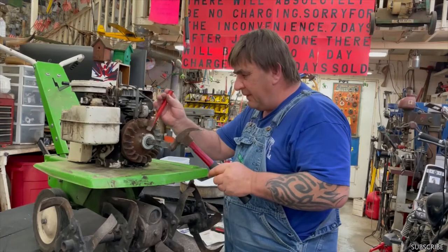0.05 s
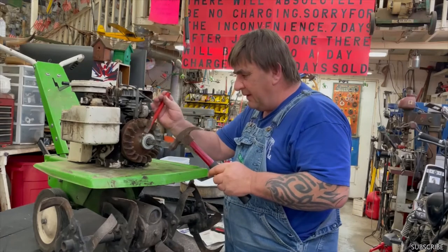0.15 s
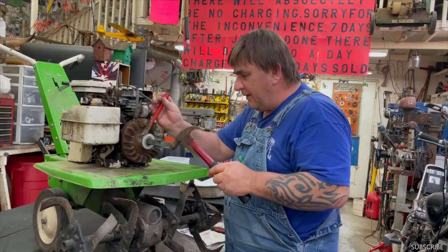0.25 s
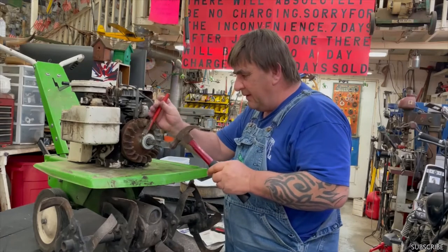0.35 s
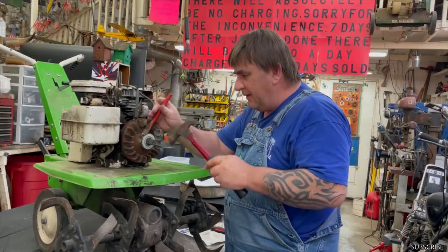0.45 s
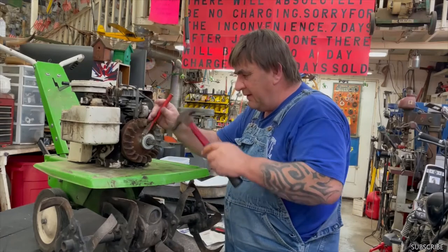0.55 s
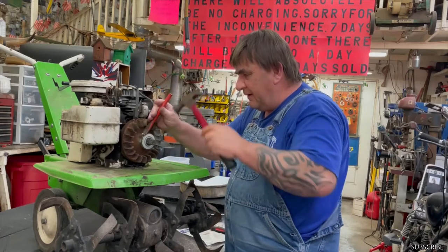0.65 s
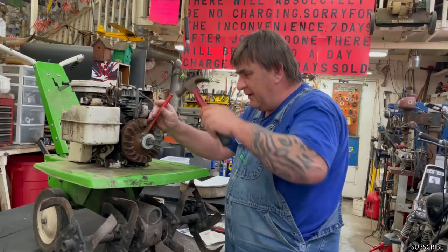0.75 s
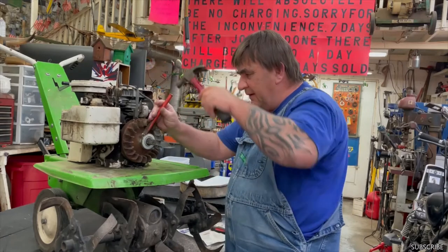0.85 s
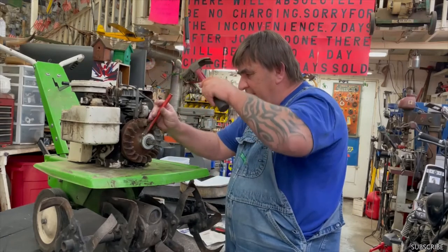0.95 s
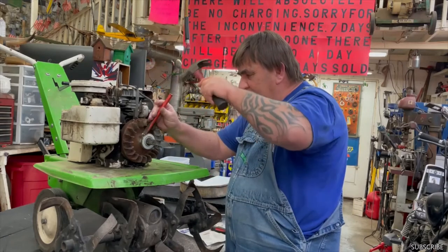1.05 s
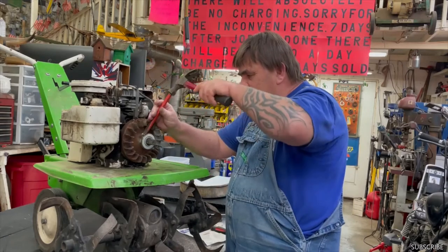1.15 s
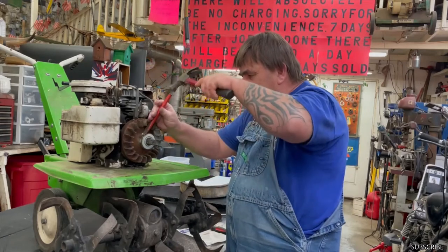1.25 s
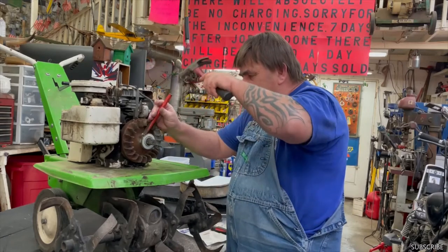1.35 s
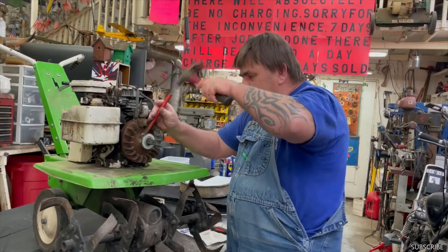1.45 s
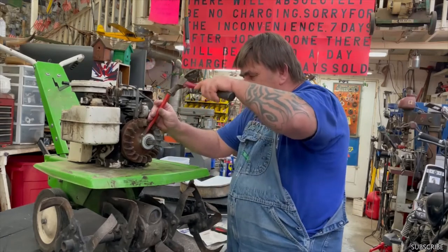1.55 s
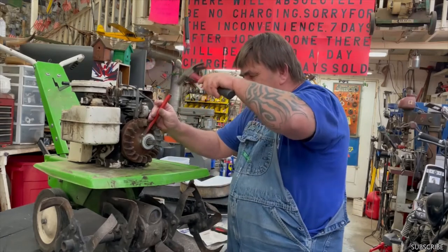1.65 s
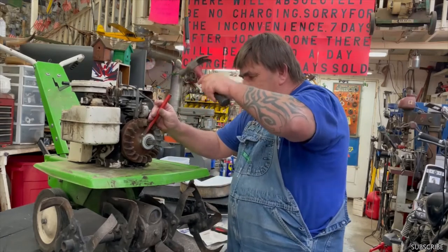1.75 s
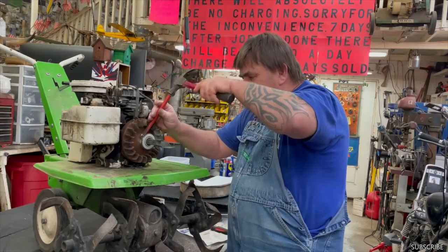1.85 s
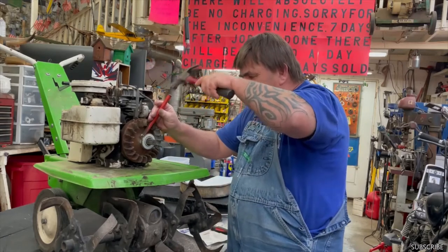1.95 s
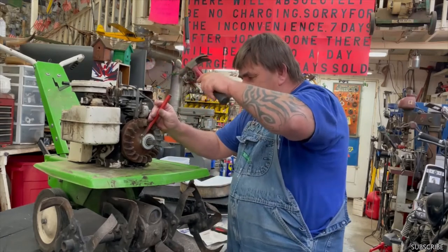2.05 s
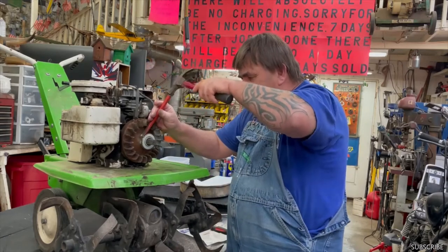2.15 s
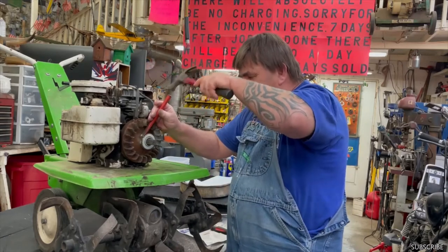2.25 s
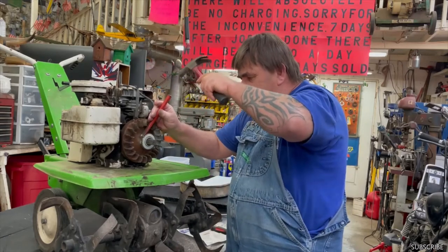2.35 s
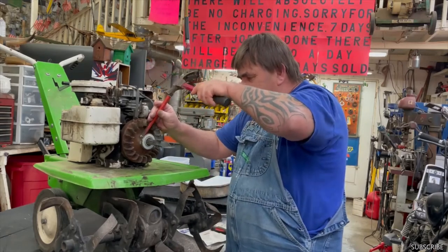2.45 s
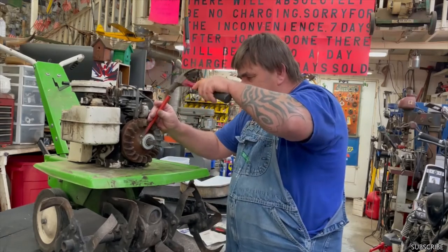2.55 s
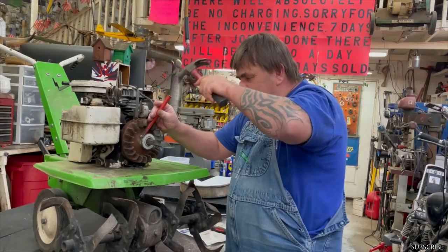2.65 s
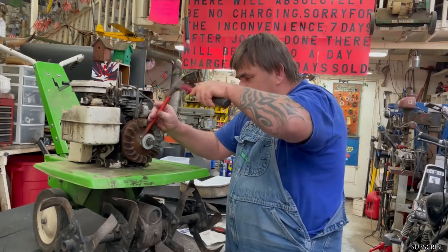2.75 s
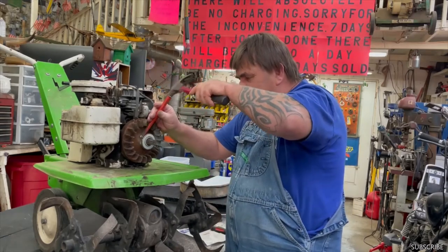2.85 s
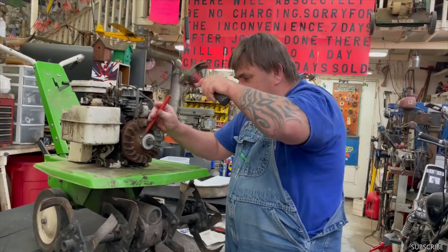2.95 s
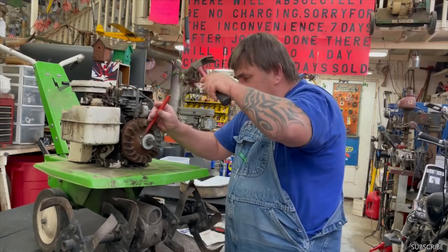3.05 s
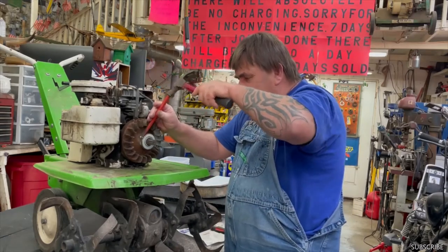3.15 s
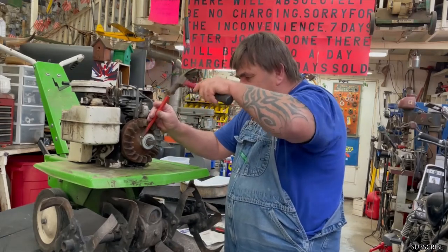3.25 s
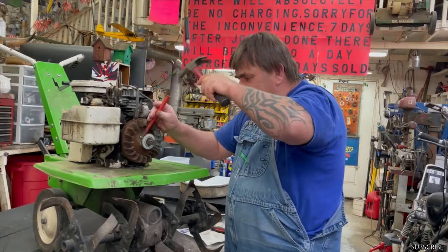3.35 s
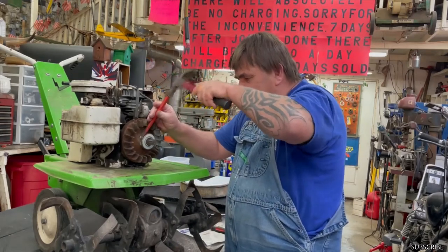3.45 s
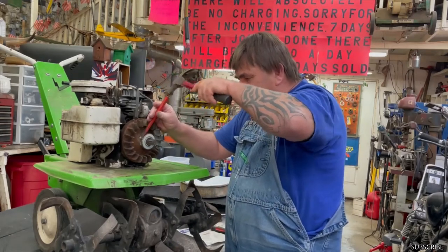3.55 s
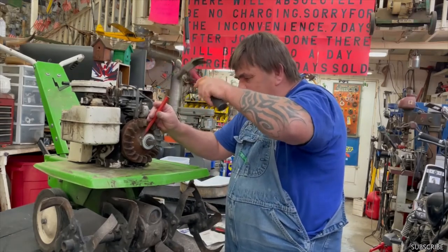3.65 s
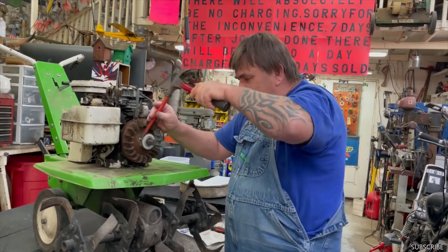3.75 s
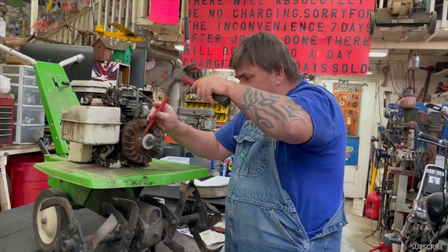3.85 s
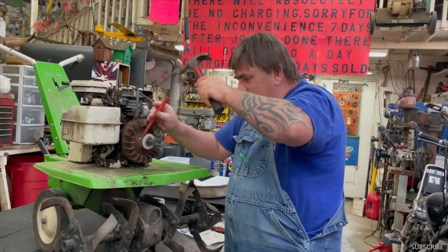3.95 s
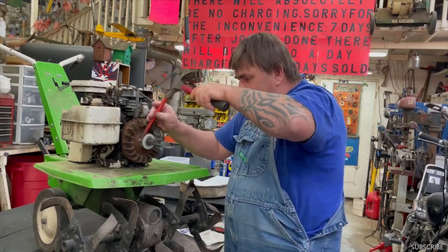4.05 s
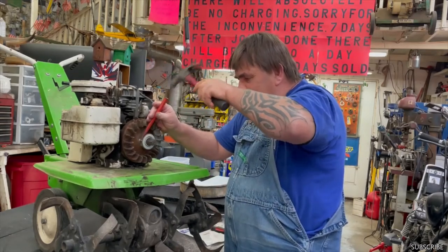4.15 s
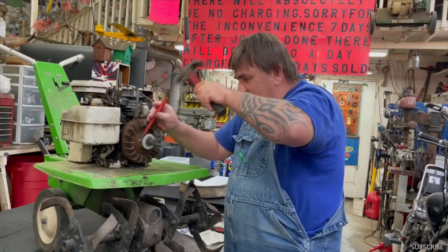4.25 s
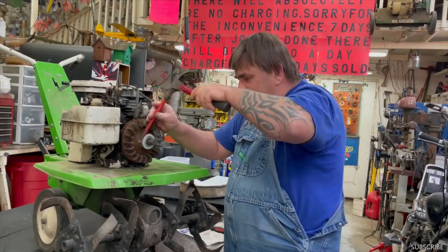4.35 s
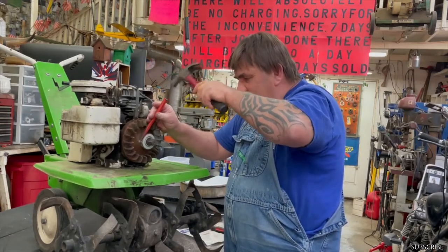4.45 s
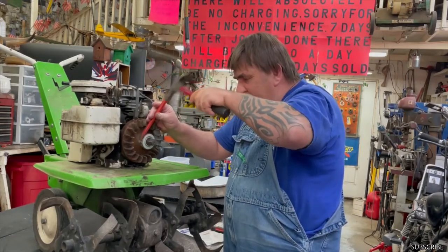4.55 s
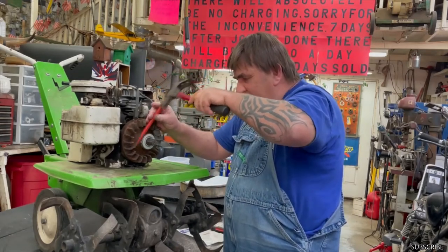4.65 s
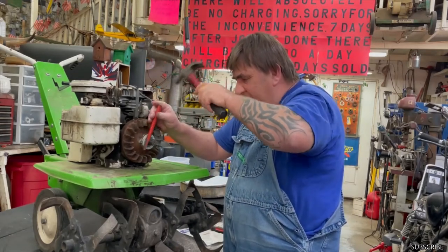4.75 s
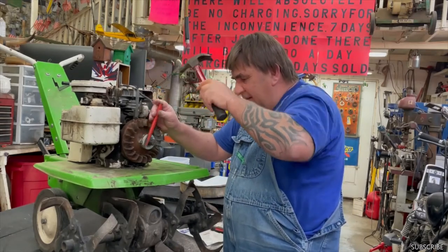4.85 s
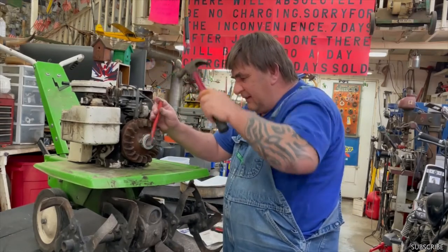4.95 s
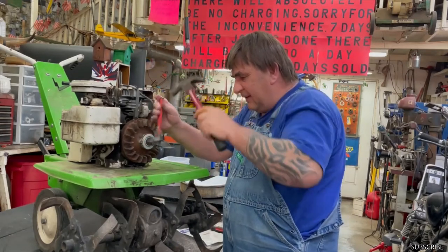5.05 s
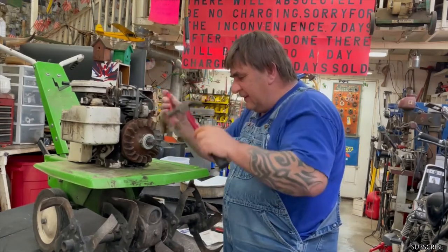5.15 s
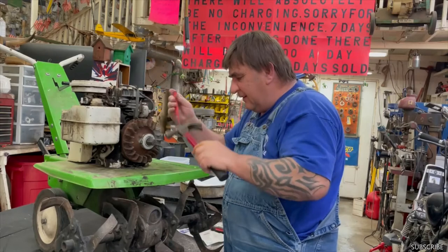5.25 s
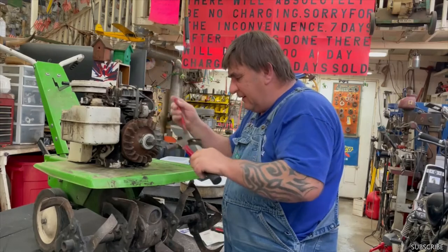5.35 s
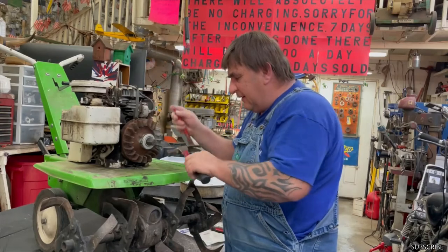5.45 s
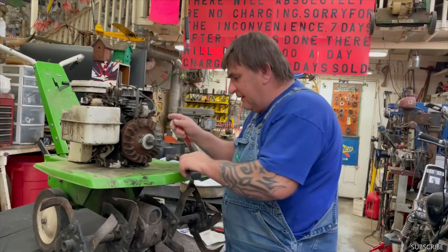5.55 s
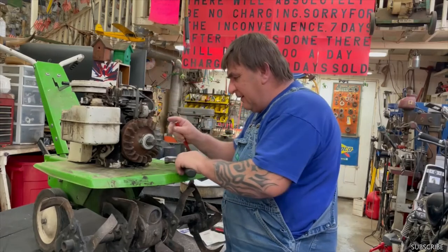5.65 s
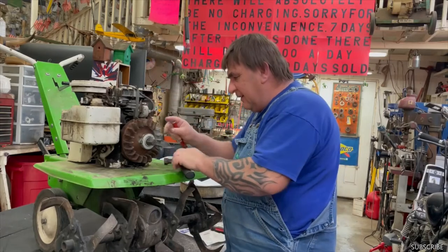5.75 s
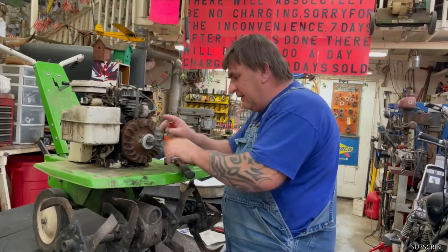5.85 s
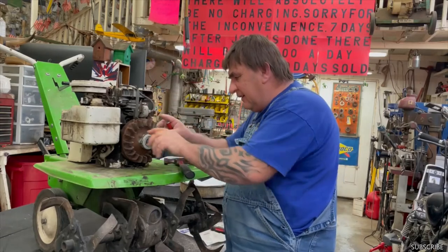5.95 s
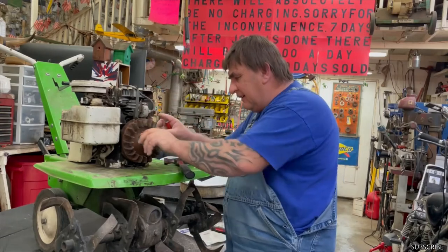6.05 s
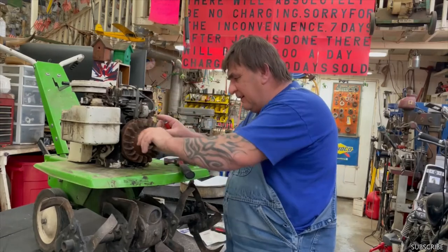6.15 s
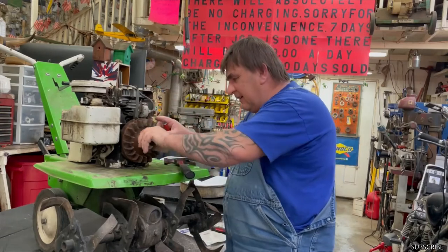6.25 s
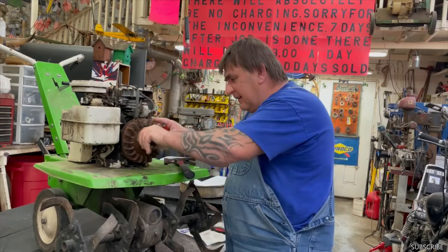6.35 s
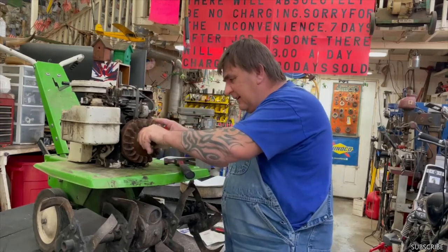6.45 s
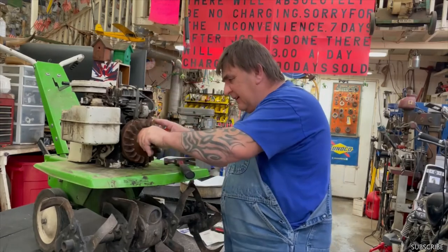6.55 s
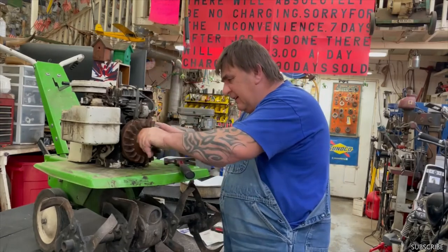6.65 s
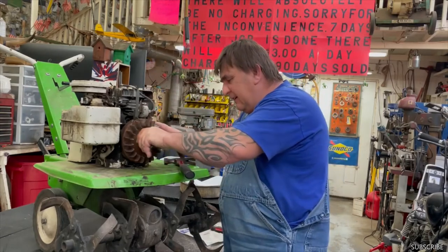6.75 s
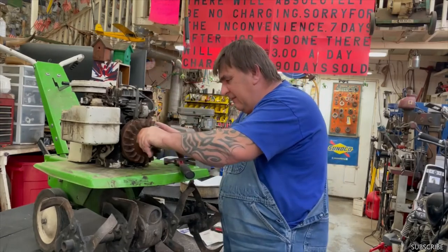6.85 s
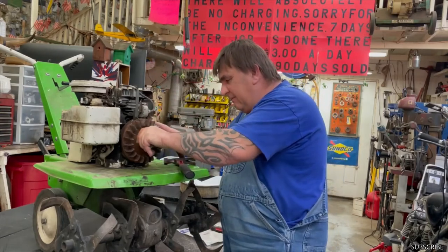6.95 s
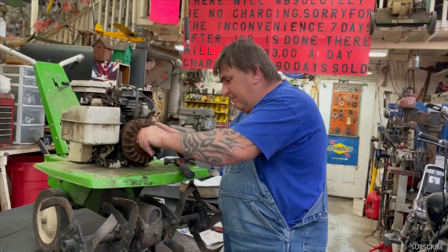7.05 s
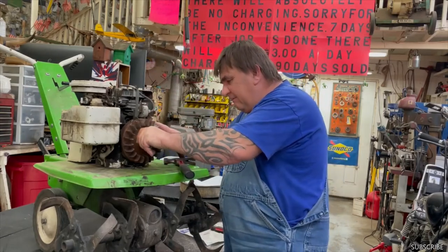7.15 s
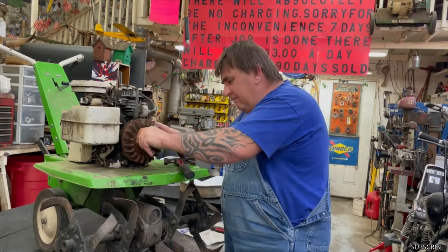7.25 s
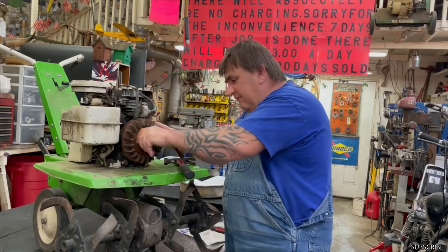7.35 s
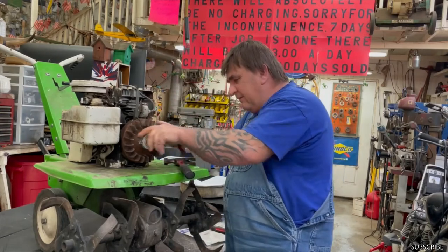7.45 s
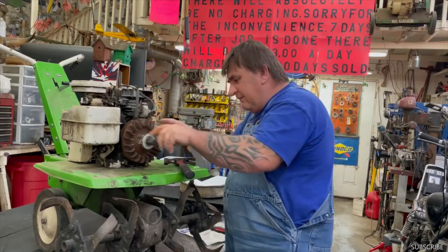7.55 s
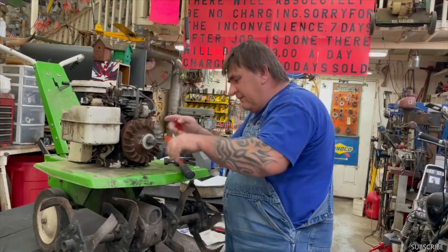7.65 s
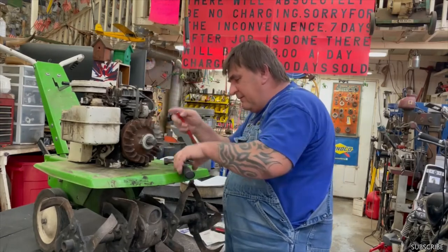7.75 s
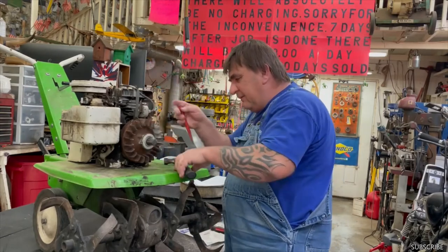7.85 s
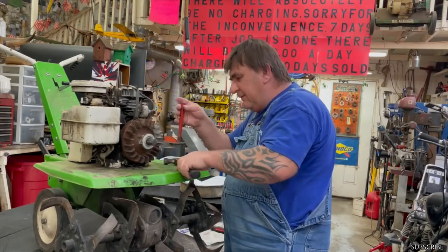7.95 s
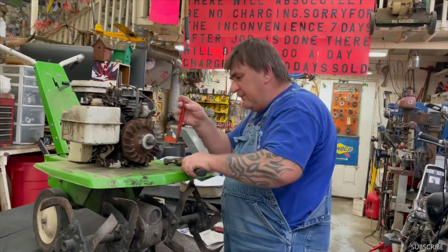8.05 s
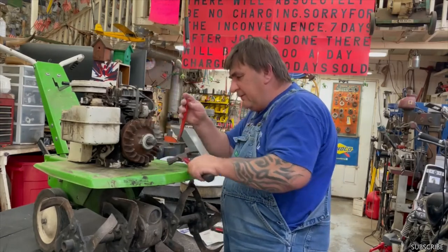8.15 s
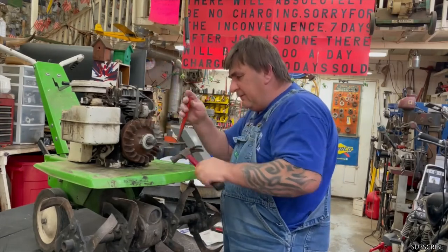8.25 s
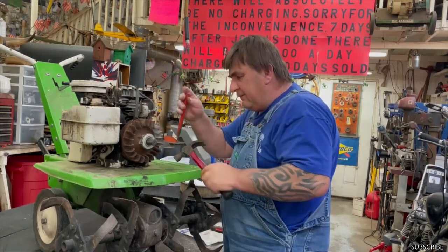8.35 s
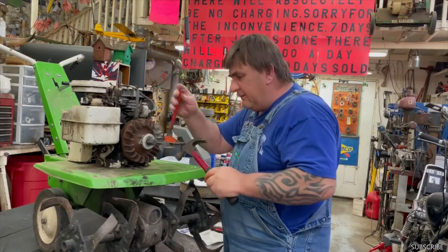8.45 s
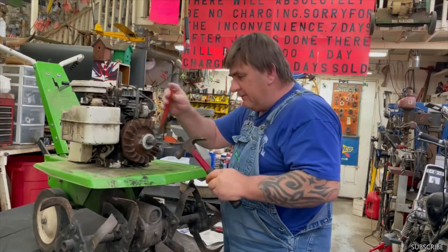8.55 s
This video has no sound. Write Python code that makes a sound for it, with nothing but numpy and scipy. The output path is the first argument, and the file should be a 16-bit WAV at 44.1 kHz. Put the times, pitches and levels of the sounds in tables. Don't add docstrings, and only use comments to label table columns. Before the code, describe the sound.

A dozen hard metal-on-metal hammer blows ring and boom through a cluttered shop, followed by a hollow tool drop, faint tinks and light scuffing.

```python
import sys
import numpy as np
from scipy import signal
from scipy.fft import rfft, irfft
from scipy.io import wavfile
from scipy.ndimage import uniform_filter1d

SR = 44100
rng = np.random.default_rng(int(sys.argv[2]) if len(sys.argv) > 2 else 0)


def attenuation_scalar(level_db):
    decades = np.asarray(level_db, float) / 20
    return 10 ** decades


def log_audio(samples):
    frames = np.atleast_2d(samples).T
    limited = np.clip(frames, -1, 1)
    pcm = np.round(limited * 32767).astype(np.int16)
    wavfile.write(sys.argv[1], SR, pcm)


N = 379260


def on_log(table, hz):
    table_hz, values = np.transpose(table)
    return np.interp(np.log(hz + 1), np.log(table_hz + 1), values)


def unit(x):
    return x / np.sqrt(np.mean(x ** 2))


def fade(t, t60):
    return np.exp(-np.log(1000) * t / t60)


def coloured(size, colour):
    hz = np.fft.rfftfreq(size, 1 / SR)
    spectrum = rfft(rng.standard_normal(size)) * attenuation_scalar(on_log(colour, hz))
    return unit(irfft(spectrum, size))


def octaves(x, count=20):
    spectrum = rfft(x)
    place = 2 * np.log2(np.fft.rfftfreq(len(x), 1 / SR) / 30 + 1e-9)
    for k in range(count):
        weight = np.clip(1 - np.abs(place - k), 0, 1)
        yield 30 * 2 ** (k / 2), irfft(spectrum * weight, len(x))


def dense_ring(colour, t60s, rise_s, size, count=20):
    t = np.arange(size) / SR
    bands = octaves(coloured(size, colour), count=count)
    rings = sum(band * fade(t, on_log(t60s, hz)) for hz, band in bands)
    return rings * (1 - np.exp(-t / rise_s))


def modes(table, scatter_db, size, detune=0.0014):
    hz, db, t60 = np.transpose(table)[:, :, None]
    t = np.arange(size) / SR
    level_draw, pitch_draw = rng.standard_normal((2, len(table), 1))
    sign = (-1.) ** np.arange(len(table))[:, None]
    level = sign * attenuation_scalar(db + scatter_db * level_draw)
    sines = np.sin(2 * np.pi * hz * (1 + detune * pitch_draw) * t)
    return np.sum(level * fade(t, t60) * sines, axis=0)


def add(track, s, x):
    i = int(s * SR)
    track[i:i + len(x)] += x[:len(track) - i]


def walk(rate):
    k = int(SR / rate)
    return uniform_filter1d(np.repeat(rng.standard_normal(N // k + 1), k), k)[:N]


def ports(shared, apart, alike):
    # hz, lead [radians]
    port_lead = [(0, 0), (300, .2), (1000, 1.1), (3000, 1.1), (5200, 1.2), (5850, -2.2), (6550, -.9),
                 (7250, -1.9), (8300, -3.1), (10000, -4.0), (11400, -4.8), (12750, -5.8), (14100, -6.3),
                 (15600, -6.8)]
    # hz, level_db
    port_tilt = [(60, 1.0), (110, 1.5), (200, 1.0), (380, 1.0), (700, 2.5), (1290, 2.0), (2380, 2.5),
                 (4400, 3.0), (8120, -0.5), (15000, 0.0)]
    hz = np.fft.rfftfreq(len(shared), 1 / SR)
    likeness = np.clip(on_log(alike, hz), 0, 1)
    middle = rfft(shared) * np.sqrt((1 + likeness) / 2)
    side = rfft(apart) * np.sqrt((1 - likeness) / 2)
    phase = np.interp(hz, *np.transpose(port_lead))
    lean = attenuation_scalar(on_log(port_tilt, hz) / 2) * np.exp(1j * phase / 2)
    return irfft(np.array([(middle + side) * lean, (middle - side) / lean]), len(shared))


def hum():
    # hz, level_db [dB per Hz]
    rumble_colour = [(12, -48), (20, -12.5), (127, -6.5), (215, -19), (318, -19.5), (555, -27), (822, -25),
                     (1000, -39.5), (1300, -58.5), (2200, -120)]
    # hz, level_db [dB per Hz]
    air_colour = [(530, -27.5), (900, -2.5), (1260, -11.5), (1390, -7), (1640, -15.5), (2120, -13),
                  (4570, -26), (5160, -29), (14000, -43), (16000, -47)]
    # pitch_hz, width_hz, level_db
    motors = [(130, 21, -61.5), (302.5, 55, -62), (473, 28, -70), (630, 26, -74), (816, 19, -69.5),
              (1388, 32, -86.5), (1620, 44, -86)]
    # hz, share [0-1]
    hum_alike = [(50, 0.2), (120, 1), (500, 0.4), (2000, 1), (8000, .2), (13000, 0.1)]
    rumble_db, air_db = -50.5 - 6, -73
    pair = np.zeros((2, N))
    for side in pair:
        bands = octaves(coloured(N, rumble_colour), count=12)
        side += attenuation_scalar(rumble_db) * sum(band * attenuation_scalar(0.71 * walk(1.3)) for _, band in bands)
        side += attenuation_scalar(air_db) * coloured(N, air_colour)
        for hz, width, db in motors:
            edges = [hz - width / 2, hz + width / 2]
            narrow = signal.butter(2, edges, "band", fs=SR, output="sos")
            side += attenuation_scalar(db) * unit(signal.sosfilt(narrow, rng.standard_normal(N)))
    return ports(*pair, hum_alike)


def scuffs():
    # start_s, length_s, hiss_db, scrape_db
    strokes = [(0.293, .09, -86.5, -97), (0.398, .06, -85, -101), (5.963, 0.4, -93, -104.5),
               (6.428, .03, -80, -84.5), (6.54, .1, -81, -83), (6.615, .015, -80, -91),
               (6.66, .07, -87, -96), (7.714, 0.416, -86, -77.5), (8.14, 0.15, -93, -86),
               (7.743, .02, -76, -78), (7.805, 0.092, -73, -80), (7.916, 0.034, -75, -73.5),
               (7.956, .012, -70, -79), (7.98, 0.013, -65, -76), (8.003, 0.076, -79, -82)]
    rise_s, t60_s = 0.004, 0.053
    hiss_colour = [(6000, -43), (10000, 9.5), (13500, 3), (14600, 9), (15600, -25)]
    scrape_colour = [(400, -13), (1500, -3.5), (4500, -1), (7500, -7), (10000, -11), (15000, -30)]
    t, out = np.arange(N) / SR, np.zeros(N)
    hiss = coloured(N, hiss_colour) * attenuation_scalar(2.4 * walk(98))
    scrape = coloured(N, scrape_colour) * attenuation_scalar(1.1 * walk(60))
    for s, length, hiss_db, scrape_db in strokes:
        stroke = np.clip((t - s) / rise_s, 0, 1) * fade(np.maximum(t - s - length, 0), t60_s)
        out += stroke * (hiss * attenuation_scalar(hiss_db) + scrape * attenuation_scalar(scrape_db))
    return out


def tinks(part, touches):
    # offset [share off centre], level_db
    cluster = [(0, 0), (-.011, -5), (.006, -3), (.017, -7)]
    # hz, level_db [dB per Hz]
    tick_colour = [(200, -15.5), (600, 13), (2500, 4), (6000, -26), (14000, -52)]
    grip_t60_s = .045
    out, t = np.zeros(N), np.arange(SR // 2) / SR
    times = np.transpose(touches)[0]
    for s, db, bright_db, tick_db in touches:
        split = [(hz * (1 + off * 0.84), mode_db + split_db + bright_db * np.log2(hz / 3000), t60)
                 for hz, mode_db, t60 in part for off, split_db in cluster]
        free_s = np.min(times[times > s], initial=s + 1) - s
        ring = modes(split, 1.5, size=len(t), detune=0.00067)
        ring = ring * fade(np.maximum(t - free_s, 0), grip_t60_s)
        tick = attenuation_scalar(tick_db) * coloured(len(t), tick_colour) * fade(t, 0.069)
        add(out, s, attenuation_scalar(db) * (ring + tick))
    return out


def small_parts():
    # pitch_hz, level_db, t60_s
    rim = [(577, -4, 0.057), (1210, -2, 0.074), (2136, -1, 0.5), (4020, -18.5, .3), (5860, -24, .11),
           (6842, -26, 0.42), (11370, -27, .15)]
    seat = [(882, 3.5, 0.056), (5300, -26.5, 0.054), (9340, -14, .05)]
    shank = [(2090, 1, .12), (5300, -4, .3), (5840, 1, 0.28), (6148, -0.5, .2), (9300, 0.5, .25),
             (10900, -5, .16), (11460, -5.5, .1), (13240, -3, .05), (14000, -1.5, .12), (14920, 3.5, .14)]
    tip = [(880, -11, 0.046), (1440, -8, 0.056), (1776, -1, 0.036), (1950, 1, 0.046), (3720, -9, .04),
           (5292, -18, .15), (6250, -10.5, .15), (6740, -18, 0.36), (8236, -7.5, 0.12), (11400, -4, 0.045),
           (12350, -11, 0.038), (13300, -13, .04)]
    nut = [(3890, -10.5, .04), (8720, 1, 0.096), (13100, 0, .07), (13600, -2, 0.043)]
    cover = [(520, -4, 0.081), (696, 9.5, 0.081), (2140, -13, 0.3), (3440, -19, 0.04), (5370, -23.5, 0.22),
             (5120, -30, .2)]
    # start_s, level_db, brightness [dB per octave], tick_db
    rim_touches = [
        (.056, -50, 0.1, 4),
        (.144, -75.5, 0.1, 25),
    ]
    seat_touches = [
        (0.143, -44, 0.077, -4),
    ]
    shank_touches = [
        (4.524, -29, 0.44, 3),
    ]
    tip_touches = [
        (4.934, -39, 0.1, 1),
    ]
    nut_touches = [
        (5.986, -86, -17, 0.53),
        (6.072, -84, 1.5, 0.5),
        (6.157, -73, -0.5, 0.5),
        (6.431, -69.5, 0, 0.51),
        (6.546, -77, 0, 8.9),
        (6.619, -79, 4.5, 0.41),
    ]
    cover_touches = [
        (6.648, -50.5, 0.5, -1),
        (6.848, -62.5, -2.5, 2),
        (6.902, -53, 13.5, 1),
    ]
    parts = [(rim, rim_touches), (seat, seat_touches), (shank, shank_touches), (tip, tip_touches),
             (nut, nut_touches), (cover, cover_touches)]
    return sum(tinks(*part) for part in parts)


def deck_drops():
    # start_s, level_db,
    # sharpness_db
    drops = [(.177, -39, -6), (4.938, -42.5, -0.5), (5.550, -17.5, 3.5), (5.582, -15, 1), (5.596, -42, 2),
             (5.688, -19.5, 4), (5.699, -16.5, -13), (5.722, -29, 6.5), (5.739, -25, -17),
             (5.8, -43.5, -28), (5.86, -45, -21.5), (5.89, -46.5, -22), (6.648, -54, -9), (6.904, -47, -19),
             (7.964, -44.5, -11), (7.988, -49.5, -4.5), (8.01, -45.5, -16), (8.06, -56, -12)]
    # hz, level_db [dB per Hz]
    deck_colour = [(59, -41), (100, -26), (136, -19.5), (256, 0), (328, -3.5), (513, -1), (678, -6),
                   (855, -4.5), (1110, -11.5), (2400, -19.5), (4000, -14.5), (5200, -17), (8800, -120)]
    # hz, t60_s
    deck_t60 = [(150, 0.22), (500, 0.13), (1500, 0.19), (4000, 0.085)]
    # hz, level_db [dB per Hz]
    clack_colour = [(590, -51), (1000, -12.5), (1780, -5.5), (2740, -3), (3990, -19), (6770, -8),
                    (10900, -13.5), (13200, -15), (14500, -20), (16500, -40)]
    out, t = np.zeros(N), np.arange(SR // 2) / SR
    for s, db, sharp_db in drops:
        clack = coloured(len(t), clack_colour) * fade(t, 0.098)
        rumble = dense_ring(deck_colour, deck_t60, 0.0127, size=len(t))
        add(out, s, attenuation_scalar(db) * (rumble + attenuation_scalar(sharp_db - 11.5) * clack))
    return out


def chatter(colour, shape):
    gain = attenuation_scalar(on_log(colour, np.fft.rfftfreq(len(shape), 1 / SR)))
    x = rng.standard_normal(len(shape))
    for _ in range(6):
        spectrum = rfft(x * shape ** .5)
        x = irfft(gain * spectrum / np.abs(spectrum), len(shape))
    x = x * shape ** .5
    return x * np.sqrt(np.sum(shape ** 2) / np.sum(x ** 2))


def chisel_blows():
    # start_s, blow_db, chisel_ring_db, block_clank_db, hammer_face_db
    blows = [(0.176, -29.5, -40, 1, -40), (1.08, 2, -15.5, -10, -27.5), (1.441, 1, -19, -11.5, -27),
             (1.773, 1.5, -17, -12.5, -24.5), (2.088, 0, -13, -10.5, -22.5),
             (2.399, 0.5, -14.5, -12.5, -25), (2.707, 2, -15.5, -15, -18), (3.117, 1.5, -22, -10, -18),
             (3.424, 0, -12, -20.5, -20.5), (3.698, 1.5, -18, -13, -22.5), (3.984, 0, -15, -11.5, -19.5),
             (4.254, 0.5, -17, -12.5, -18), (4.521, 0, -17, -13, -14.5), (4.546, -12.5, -37.5, -17.5, -32),
             (4.931, -24.5, -53.5, -22, -12)]
    # hz, level_db [dB per Hz]
    crack_colour = [(250, -24), (600, -9), (900, 0.5), (1250, -6), (2000, -5.5), (3200, -4), (4300, -6.5),
                    (6000, -5.5), (8000, -2.5), (10000, -12), (12300, -15), (16500, -31)]
    # hz, level_db [dB per Hz]
    face_colour = [(8000, -35), (10500, -2), (12300, -8), (14200, -0.5), (15200, 3.5), (16500, -15)]
    # pitch_hz, level_db, t60_s
    chisel = [(4638, -5.5, 0.33), (4860, -1, 1), (4881, -2, 0.3), (5230, -4.5, .3), (5313, -15.5, 0.33),
              (9545, -20, .2)]
    # pitch_hz, level_db, t60_s
    block = [(833, -1, 0.024), (877.5, 0.5, 0.027), (971, -0.5, 0.012), (1031, 0, 0.045), (1463, -7, 0.018),
             (663.5, -13, 0.057)]
    # pitch_hz, level_db
    fins = [(2070, -8), (2420, 0.5), (2540, -16.5), (2920, -5.5), (3100, -12.5), (3390, -7), (3645, -5),
            (5180, -7), (5740, -7), (6640, -9.5), (7320, -1.5), (7770, -11.5), (8720, -4.5), (10950, -9.5),
            (14060, -7), (15170, -1.5)]
    # hz, level_db [dB per Hz]
    frame_colour = [(24, -43.5), (40, -25.5), (86, -0.5), (97, 4.5), (129, -5.5), (161, 1), (206, -12),
                    (249, 0), (338, -14), (500, -12.5), (650, -47), (1100, -120)]
    # hz, t60_s
    frame_t60 = [(60, 1.2), (150, .9), (400, 0.8)]
    fins_t60_s, fins_scatter_db, fins_db = .03, 3, -19
    boom_db, boom_db_per_s = -35, -1.61
    lead_s = .0004
    out, clanks, t = np.zeros(N), np.zeros(N), np.arange(SR // 2) / SR
    rebounds = np.exp(-(t / 0.011) ** 2) + attenuation_scalar(-9.5) * fade(t, 0.084)
    shape = (rebounds * (1 - np.exp(-t / 0.00061)))[:4096]
    fin_modes = [(*fin, fins_t60_s) for fin in fins]
    grip = attenuation_scalar(5 * walk(70))
    for s, db, ring_db, clank_db, face_db in blows:
        flutter = np.roll(grip, -int(s * SR))[:len(t)]
        sound = attenuation_scalar(ring_db - 25) * flutter * modes(chisel, 2.5, size=len(t), detune=.0015)
        clank = attenuation_scalar(clank_db - 3.0) * modes(block, 3.3, size=len(t), detune=0.019)
        clank *= 1 - np.exp(-t / 0.00097)
        clank += attenuation_scalar(ring_db + 0.5) * modes([(4800, 0, 0.061)], 0, size=len(t), detune=0.0027)
        fin_ring = modes(fin_modes, fins_scatter_db, size=len(t), detune=0.0056)
        clank += attenuation_scalar(fins_db) * fin_ring * (1 - np.exp(-t / 0.0014))
        crack = attenuation_scalar(-19.0) * chatter(crack_colour, shape)
        face = attenuation_scalar(face_db - 6.0) * chatter(face_colour, shape)
        add(sound, 0, crack + face)
        top_hz = np.interp(db, [-32, -10], [2200, 20000])
        sound, clank = signal.lfilter(*signal.butter(1, top_hz, fs=SR), [sound, clank])
        add(clanks, s - lead_s, attenuation_scalar(db) * clank)
        add(out, s - lead_s, attenuation_scalar(db) * sound * (1 - t / t[-1]))
        boom = dense_ring(frame_colour, frame_t60, 0.0032, size=SR, count=10)
        add(out, s, attenuation_scalar(db + boom_db + boom_db_per_s * s) * boom)
    return out, clanks


def shop(dry, near):
    # hz, t60_s
    shop_t60 = [(150, 1), (400, 0.461), (1040, 0.78), (2760, 0.54), (7280, 0.36)]
    # hz, level_db
    shop_colour = [(100, -8), (500, -1.5), (1000, -6.5), (2000, -4), (6000, -7.5), (9000, -5),
                   (15100, -14.5), (15900, -29.5)]
    # hz, share [0-1]
    echo_alike = [(100, .78), (300, 0.8), (600, 0.1), (1000, 0.8), (3000, 0.1), (6000, 0.2), (8500, 0.7),
                  (12000, 0.2)]
    near_echo_db = -6
    echoes = [dense_ring(shop_colour, shop_t60, 0.00044, size=SR) * attenuation_scalar(-35) for _ in range(2)]
    sent = dry + attenuation_scalar(near_echo_db) * near
    wet = [signal.fftconvolve(sent, echo)[:N] for echo in echoes]
    delayed = np.roll(dry + near, 37)
    direct = ports(dry + near, delayed, [(3000, 1), (8000, .75), (13000, .85)])
    return direct + ports(*wet, echo_alike)


def scene():
    blows, clanks = chisel_blows()
    return shop(blows + deck_drops() + scuffs(), clanks + small_parts()) + hum()


def smear(x):
    haze_db, haze_t60_s = -29, 0.069
    colour = [(1500, -20), (4000, -7), (6500, 5.5), (8500, -2), (12000, -27.5)]
    haze = coloured(1024, colour) * fade(np.arange(1024) / SR, haze_t60_s)
    haze = attenuation_scalar(haze_db) * haze / np.sqrt(np.sum(haze ** 2))
    return x + signal.fftconvolve(x[:, ::-1], haze[None])[:, :N][:, ::-1]


def roll_off(x):
    return signal.sosfilt(signal.butter(12, 16800, fs=SR, output="sos"), x)


def record(dry):
    rounded = np.tanh(0.74 * smear(dry)) / 0.63
    low = signal.butter(2, 38, "high", fs=SR, output="sos")
    top = signal.ellip(8, .2, 70, 16100, fs=SR, output="sos")
    mix = signal.sosfilt(np.vstack([low, top]), rounded)
    return roll_off(mix)


dry = scene()
out = record(dry)
log_audio(out)
```